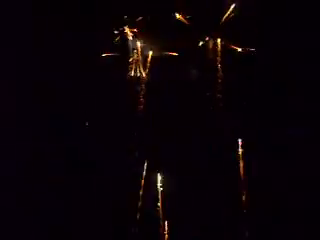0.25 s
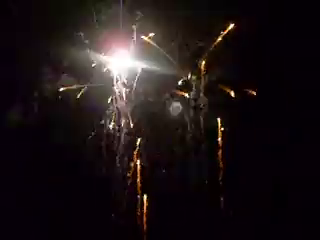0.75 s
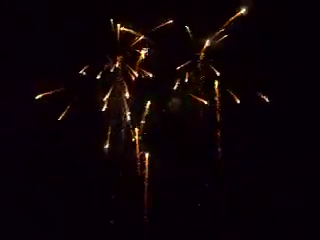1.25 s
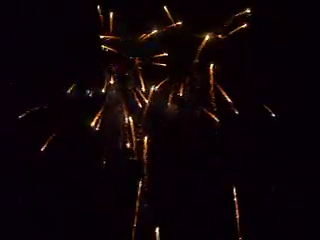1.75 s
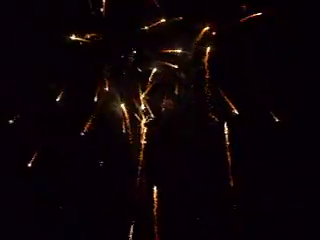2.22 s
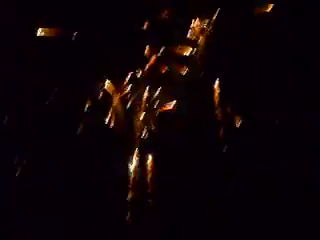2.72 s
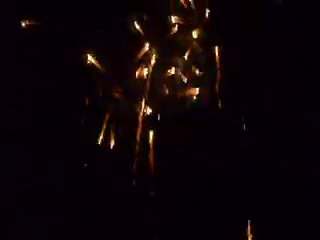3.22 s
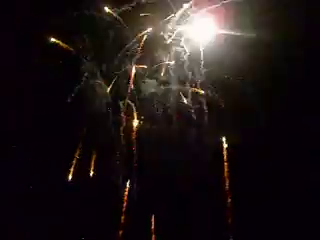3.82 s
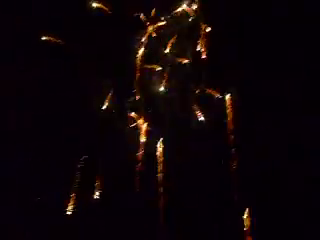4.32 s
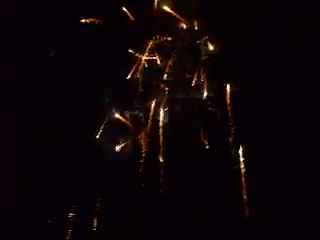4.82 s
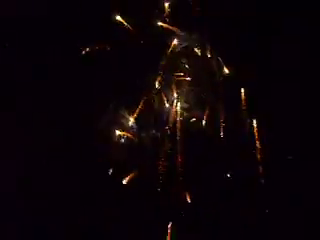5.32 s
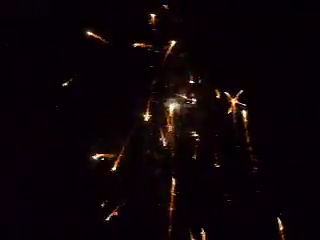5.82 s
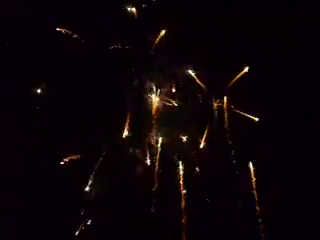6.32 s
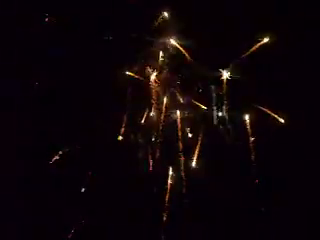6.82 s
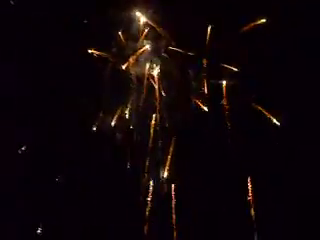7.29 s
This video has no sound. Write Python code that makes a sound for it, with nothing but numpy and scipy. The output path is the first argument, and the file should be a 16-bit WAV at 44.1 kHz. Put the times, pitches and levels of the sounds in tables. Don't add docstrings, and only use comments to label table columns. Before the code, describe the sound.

Over a faint distant rumble, thin crackling grows within a second into dense, uneven snapping that never stops. Irregular heavy bangs, sometimes in close pairs, mix with short low launch thuds from the ground. Nearby walls return tight slaps and a diffuse tail; the small band-limited microphone flattens and distorts the nearest pops.

```python
import sys
import numpy as np
from scipy import signal
from scipy.io import wavfile
from scipy.ndimage import uniform_filter1d

SR = 44100
rng = np.random.default_rng(int(sys.argv[2]) if len(sys.argv) > 2 else 0)


def voltage_ratio(decibels):
    exponent = np.asarray(decibels, float) / 20
    return 10 ** exponent


def transcribe(signal):
    frames = np.atleast_2d(signal).T
    limited = np.clip(frames, -1, 1)
    pcm = np.round(limited * 32767).astype(np.int16)
    wavfile.write(sys.argv[1], SR, pcm)


N = 332955

# start_s, push_db, mortar_number
LAUNCHES = [(1.0039, -10.4, 1), (1.1562, -7.1, 0), (1.2661, -7.8, 2), (1.8645, -8.1, 0), (2.9087, -10.3, 2),
            (3.2672, -9.2, 0), (3.5179, -6.9, 1), (4.0265, -8.8, 2), (4.8948, -8.3, 0), (5.2743, -8.3, 2),
            (5.4441, -5.3, 1), (5.8933, -7.2, 0), (6.7194, -7.0, 0), (6.8228, -7.8, 1), (6.9469, -7.1, 2)]
# time_s, level_db
SKY_LEVEL = [(0.0, -20), (0.12, -22), (0.22, -26.5), (0.3, -21), (0.55, -23), (0.64, -21.5), (0.7, -18.5),
             (1.2, -16.5), (2.9, -17.5), (3.07, -18), (3.32, -16.5), (3.49, -19), (3.55, -16), (4.3, -16),
             (6.1, -17.5), (6.64, -16.5), (6.8, -15.5), (7.55, -16)]
SKY_REF_DB = -17
GROUND_LAG_MS = 1.68


def train(seconds, sizes):
    out = np.zeros(N)
    at = np.round(np.asarray(seconds) * SR).astype(int)
    np.add.at(out, np.clip(at, 0, N - 1), sizes)
    return out


def poles(hz, width_hz):
    r = np.exp(-np.pi * width_hz / SR)
    return np.array([1, -2 * r * np.cos(2 * np.pi * hz / SR), r * r])


def band(x, low_hz, high_hz):
    sos = signal.butter(2, [low_hz, high_hz], "band", fs=SR, output="sos")
    return signal.sosfilt(sos, x + 1e-18)


def band_limit(x):
    steep = signal.firwin(numtaps=115, cutoff=5584, window=("kaiser", 7.0), fs=SR)
    return signal.fftconvolve(x, steep, mode="same")


def echoes(x, lag_level):
    out = x.copy()
    for lag_ms, level_db in lag_level:
        lag = int(lag_ms * SR / 1000)
        out[lag:] += voltage_ratio(level_db) * x[:N - lag]
    return out


def scatter(x, gap_ms, t60_s, low_hz, high_hz):
    t = np.arange(SR // 2) / SR
    onset = np.clip(t * 1000 / gap_ms, 0, 1) ** 2
    tail = rng.standard_normal(len(t)) * voltage_ratio(-60 * t / t60_s) * onset
    tail = band(tail, low_hz, high_hz)
    return signal.fftconvolve(x, tail / np.sqrt(np.sum(tail ** 2)))[:N]


def mortar_echoes():
    # wall_lag_ms, crack_peak_db
    mortars = [
        (49.7, -5),
        (52.1, 0),
        (55.2, 1),
    ]
    return np.transpose([mortars[mortar] for _, _, mortar in LAUNCHES])


def rumble():
    return voltage_ratio(-29.0) * band(rng.standard_normal(N), 20, 400)


def n_wave(length_ms):
    wave = np.linspace(-1, 1, max(int(length_ms * SR / 1000), 3))
    return wave / band_limit(np.pad(wave, 200)).max()


def small_stars():
    rate_per_s, level_db, spread_db = 1000, -17.4, 4.7
    busy_db = np.interp(np.arange(N) / SR, *np.transpose(SKY_LEVEL)) - SKY_REF_DB
    clumps = uniform_filter1d(rng.standard_normal(N), size=500) * np.sqrt(500)
    born = rng.random(N) < rate_per_s * voltage_ratio(busy_db + 2.4 * clumps) / SR
    size = np.minimum(rng.exponential(1, N), 3.0 + 0.18 * busy_db)
    return born * voltage_ratio(0.38 * busy_db + level_db + spread_db * size)


def stars():
    # start_s, peak_db
    first_stars = [(0.036, -9), (0.0812, -9), (0.1778, -8), (0.2436, 0), (0.275, -6), (0.2894, -6),
                   (0.3194, -6), (0.3399, 0), (0.381, -8), (0.4006, -5), (0.5129, -6), (0.5163, -5),
                   (0.5529, -7), (0.5682, -4), (0.5748, 1), (0.5953, -6), (0.6634, -8), (0.6772, -5),
                   (0.6968, -6), (0.7169, -5), (0.755, -4), (0.7958, -5), (0.8505, -1)]
    # start_s, peak_db
    near_stars = [(0.9696, 0), (1.2845, 1), (1.4185, 1), (1.5145, 2), (1.5385, 3), (1.6566, 1), (1.9654, 1),
                  (2.0723, 0), (2.5124, 2), (2.9061, 1), (3.5108, 2), (3.6976, 1), (4.0362, 3), (4.0914, 1),
                  (4.1144, 1), (4.2036, 1), (4.4756, 3), (4.9889, 3), (5.1612, 0), (5.3856, 0), (5.5161, 1),
                  (5.6355, 1), (6.1605, 0), (6.3756, 1), (6.4036, 2), (6.8429, 2), (6.9858, 2), (7.2353, 1),
                  (7.2921, 0), (7.4523, 2)]
    wall_db = -14
    lag_ms, crack_db = mortar_echoes()
    cracks = list(zip(np.transpose(LAUNCHES)[0] + lag_ms / 1000, crack_db))
    at_s, peak_db = np.transpose(near_stars + first_stars + cracks)
    clicks = small_stars() + train(at_s - .0001, voltage_ratio(peak_db))
    patch = rng.integers(0, 12, size=N)
    out = np.zeros(N)
    for k, (size, height) in enumerate(rng.uniform(-1, 1, (12, 2))):
        waves = np.convolve(clicks * (patch == k), n_wave(0.26 * voltage_ratio(3.2 * size)))[:N]
        ground = echoes(waves, [(GROUND_LAG_MS + .15 * height, -8.0)]) - waves
        ground = band(ground, 300, 4500)
        wall_ms = 4.7 + .5 * height
        walls = [(wall_ms, wall_db), (wall_ms + GROUND_LAG_MS, wall_db - 10.0)]
        diffuse = voltage_ratio(-12.0) * scatter(waves, 1.4, 0.7, 330, 5600)
        out += echoes(waves, walls) + ground + diffuse
    return out


def shock(half_ms):
    half = half_ms * SR / 1000
    t = np.arange(int(12 * half_ms * SR / 1000)) / half
    return -(1 - t) * np.exp(-t)


def bursts():
    # start_s, wall_lag_ms
    shells = [(0.1119, 4.72), (0.4261, 4.92), (1.1199, 4.97), (1.2018, 5.03), (1.5419, 4.4), (2.4024, 4.26),
              (2.675, 4.51), (2.7149, 5.15), (2.8401, 4.92), (4.161, 5.1), (4.4103, 4.01), (4.4314, 5.08),
              (4.9551, 4.85), (5.9831, 4.69), (6.5117, 4.72), (7.074, 4.72), (7.1108, 4.65)]
    # lag_ms, level_db
    returns = [
        (1.15, -15),
        (7.0, -18),
        (12.2, -19),
        (17.5, -19),
        (32.0, -19),
    ]
    burst_db = 8.0
    at_s, wall_ms = np.transpose(shells)
    hits = echoes(train(at_s, voltage_ratio(burst_db)), [(GROUND_LAG_MS, -6.4)] + returns)
    hits = hits + train(at_s + wall_ms / 1000, voltage_ratio(burst_db - 8))

    rebound = poles(400, 1500)
    front = np.append(shock(.23), np.zeros(300))
    wave = 4.4 * np.sqrt(rebound.sum()) * signal.lfilter([1, -1], rebound, front)

    busy_db = np.interp(at_s, *np.transpose(SKY_LEVEL)) - SKY_REF_DB
    tail_db = -18.0 - 0.55 * busy_db
    tail = np.convolve(train(at_s, voltage_ratio(burst_db + tail_db)), wave)[:N]
    tail = scatter(tail, 17.6, .2, 200, 950)
    body = voltage_ratio(-0.5) * band(np.convolve(hits, shock(0.54))[:N], 123, 260)
    return np.convolve(hits, wave)[:N] + tail + body


def launches():
    # push_hz, push_gain_db, crack_db, wall_echo_db
    tubes = [
        (290, 0.0, 12.5, -11.0),
        (215, 1.5, 14.5, -9.0),
        (245, 0.5, 16.5, -10.5),
    ]
    push_top_s, push_bias = .0028, .22
    at_s, push_db, mortar = np.transpose(LAUNCHES)
    echo_s = at_s + mortar_echoes()[0] / 1000
    t = np.arange(600) / SR
    swell = (t / .0024 * np.exp(1 - t / .0024)) ** 3
    crack = (t < .0017) * np.exp(-t / .0025)
    noise = band(rng.standard_normal(N), 2000, 5000)
    sizes = train(at_s, voltage_ratio(push_db)) + train(echo_s, voltage_ratio(push_db))
    low, gate = np.zeros(N), np.zeros(N)
    for k, (push_hz, gain_db, crack_db, echo_db) in enumerate(tubes):
        own = mortar == k
        hits = train(at_s, own * 1.0) + train(echo_s, own * voltage_ratio(echo_db))
        swing = push_bias + np.cos(2 * np.pi * push_hz * (t - push_top_s))
        low += np.convolve(hits * sizes, voltage_ratio(gain_db) * swing * swell)[:N]
        gate += voltage_ratio(crack_db) * np.convolve(hits * sizes, crack)[:N]
    return low + gate * noise + voltage_ratio(-29.0) * scatter(low, 6.0, 0.31, 90, 330)


def scene():
    return (rumble() + stars() + bursts() + launches())[None]


def low_pass(x):
    return signal.sosfilt(signal.butter(12, 16450, fs=SR, output="sos"), x)


def record(dry):
    # freq_hz, width_hz, gain_db
    capsule = [
        (2270, 190, 0),
        (3205, 760, -2.5),
        (1560, 1430, -3),
        (4700, 1200, 1),
        (5080, 600, 0.5),
    ]
    overload = .72
    x = signal.sosfilt(signal.butter(1, 54.4, "high", fs=SR, output="sos"), dry[0])
    for hz, width_hz, gain_db in capsule:
        a = poles(hz, width_hz)
        peak = signal.lfilter((1 - a[2]) / 2 * np.array([1, 0, -1]), a, x)
        x = x + (voltage_ratio(gain_db) - 1) * peak
    x = band_limit(x)
    x = x / (1 + (np.abs(x) / overload) ** 30) ** (1 / 30)
    x = signal.sosfilt(signal.butter(1, 9000, fs=SR, output="sos"), x) * 1.03
    x = signal.sosfilt(signal.cheby2(12, 50, 16700, fs=SR, output="sos"), x)
    return low_pass(x[None])


dry = scene()
out = record(dry)
transcribe(out)
```